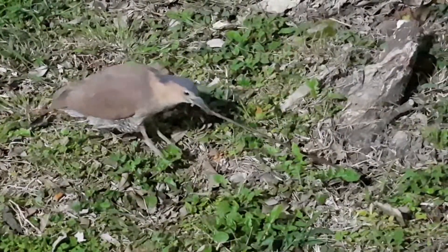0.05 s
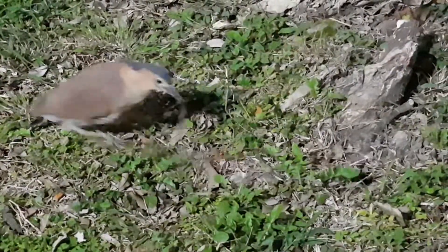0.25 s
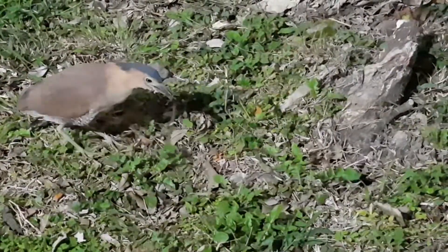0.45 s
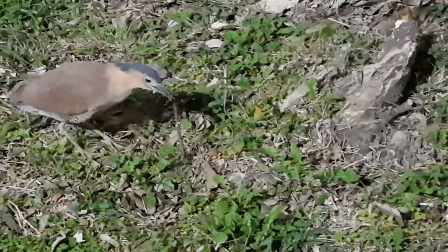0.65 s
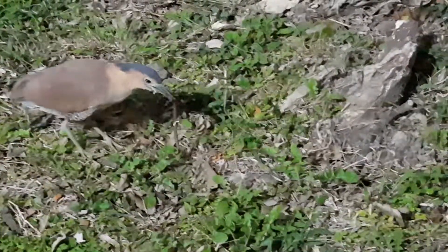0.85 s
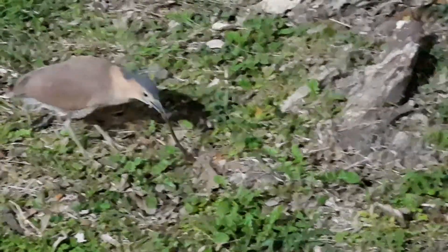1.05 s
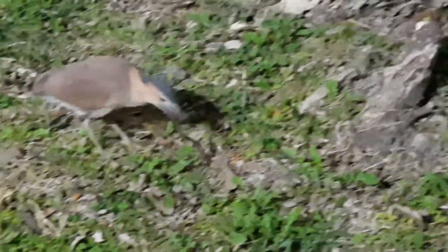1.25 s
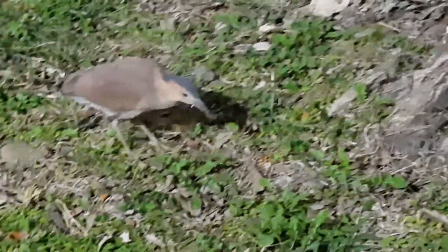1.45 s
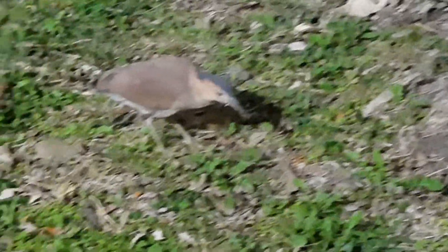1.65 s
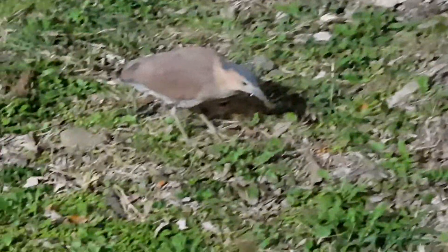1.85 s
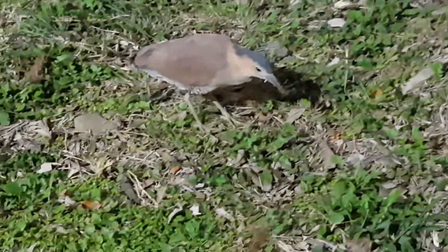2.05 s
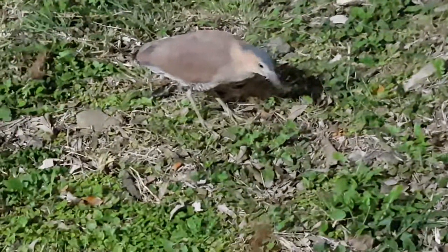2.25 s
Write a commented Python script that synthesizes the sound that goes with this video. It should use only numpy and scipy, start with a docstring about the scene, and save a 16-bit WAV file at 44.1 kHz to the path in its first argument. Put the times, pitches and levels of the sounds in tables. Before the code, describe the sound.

Low wind rumbles gently over open ground while the camera is shifted in the hand. Light finger rubs and small clicks lead to a short stutter with two pops close on the left, then a few soft thumps.

```python
"""Handling a camera outdoors

Air rumbles softly around a hand-held camera whose two microphone ports hiss.
As it is shifted, fingers slide over the case, making friction noise and small ticks.
At the left port, pushes of air give dull bumps, a finger judders by stick-slip motion,
and two sharp pressure pulses are heard as pops."""
import sys
import numpy as np
from scipy import signal
from scipy.fft import rfft, irfft, next_fast_len
from scipy.io import wavfile
from scipy.ndimage import map_coordinates

SR = 44100
rng = np.random.default_rng(int(sys.argv[2]) if len(sys.argv) > 2 else 0)


def master(y):
    """Save y as 16-bit WAV."""
    cut = np.clip(np.atleast_2d(y).T, -1, 1)
    pcm = np.round(cut * 32767)  # scale
    wavfile.write(sys.argv[1], SR, pcm.astype(np.int16))


N = 105840

# Envelopes of the outdoor rumble and its deepest part: t/s, level/dB
RUMBLE_ENVELOPE = [(0, -41), (.25, -41.5), (.42, -44), (.7, -41.5), (1.2, -40), (1.35, -45), (1.7, -46),
                   (1.95, -48), (2.2, -46), (2.4, -46)]
DEEP_ENVELOPE = [(0, -45), (.2, -41), (.55, -42.5), (.8, -43), (1.2, -42.5), (1.5, -47), (1.8, -46),
                 (2.2, -38.5), (2.4, -48)]
# Their spectra: f/Hz, relative density/dB
RUMBLE_SPECTRUM = [(15, -30), (40, -18.5), (75, 0), (120, 0), (170, -7), (300, -13.5), (500, -20.5),
                   (1000, -30), (2000, -50), (4000, -58)]
DEEP_SPECTRUM = [(15, -48), (27, -32), (37, -3), (58, 8), (80, -9.5), (130, -34.5), (500, -74)]
# Likeness of the rumble at the two ports: f/Hz, coherence/1
RUMBLE_COHERENCE = [(60, 0.92), (150, 0.99), (380, 0.83), (950, 0.17), (2400, 0.091)]
# Hiss of each port: f/Hz, relative density/dB
LEFT_HISS_SPECTRUM = [(200, -4), (700, -1), (1050, -14.5), (1550, -3.5), (2250, -10), (2650, -1),
                      (2950, -2), (3350, -18), (5000, -20), (6300, -35), (8000, -43), (10000, -26.5),
                      (12300, -26.5), (15500, -26)]
RIGHT_HISS_SPECTRUM = [(200, 4), (700, -3.5), (1500, -7.5), (2800, -15), (3600, -16.5), (5300, -12),
                       (5800, -3), (6300, 4), (7000, -4.5), (7600, -21), (9000, -31), (11000, -21),
                       (12300, -13), (13500, -21.5), (15500, -27)]
# Friction of a light brush (right), a slide at each port and a midrange swell (left): t/s, level/dB
BRUSH_ENVELOPE = [(.13, -66), (.17, -51), (.215, -50), (.275, -49.5), (.3, -57), (.36, -55), (.42, -67)]
LEFT_SLIDE_ENVELOPE = [(.7, -69), (.85, -66), (.95, -57.5), (1.05, -56), (1.16, -49), (1.22, -55),
                       (1.28, -69), (1.45, -75)]
RIGHT_SLIDE_ENVELOPE = [(.75, -71), (.95, -62), (1.08, -57.5), (1.2, -49.5), (1.35, -54.5), (1.57, -51.5),
                        (1.75, -55), (1.86, -61), (2, -88)]
SWELL_ENVELOPE = [(1, -73), (1.2, -49), (1.4, -60), (1.72, -56.5), (1.85, -70), (1.95, -84)]
# Their spectra: f/Hz, relative density/dB
BRUSH_SPECTRUM = [(400, -1), (1500, 1.5), (3000, -5.5), (4700, -1.5), (6300, 5.5), (8500, -10), (10500, -2),
                  (13000, -0.5), (15500, -7)]
LEFT_SLIDE_SPECTRUM = [(300, -10), (1000, -7), (2300, -20), (3700, -4.5), (5000, 1.5), (7500, -18),
                       (9300, -5), (11500, -11.5), (15500, -27)]
RIGHT_SLIDE_SPECTRUM = [(300, 2.5), (1000, -10.5), (1800, 0), (3300, -7), (4700, -3.5), (8500, -14),
                        (11500, -11), (15500, -19)]
SWELL_SPECTRUM = [(400, -3), (1200, -1.5), (2000, -0.5), (3300, -14), (6000, -38), (12000, -34)]
# Dry ticks on the case: t/s, level/dB, T60/s, left minus right/dB, ring f/Hz
CASE_TICKS = [(0.208, -40.5, 0.025, -26, 11000), (0.2106, -30, 0.015, -27, 10800),
              (0.2755, -30.5, 0.0064, -27, 11100), (.457, -43, .005, -14, 10900),
              (0.9202, -35, 0.015, 2, 4750), (1.025, -35, .012, 3.5, 5260),
              (1.7095, -23, 0.0057, -36, 6200), (1.7705, -42, 0.0042, -15, 6300),
              (2.097, -55, .005, -18, 6300), (2.3201, -31.5, 0.0072, -34, 5600)]
# Soft bumps at the left port: t/s, level/dB, f/Hz
PORT_BUMPS = [(.869, -23, 153), (.946, -22.5, 108), (1.652, -24, 92), (1.673, -25, 122), (1.695, -23, 131),
              (1.715, -14, 127), (1.722, -18, 73), (1.798, -27, 98)]
# Strength of the finger's slips over the left port: t/s, level/dB
JUDDER_ENVELOPE = [(1.203, -26), (1.221, -18), (1.236, -15), (1.26, -11), (1.292, -15), (1.312, -20),
                   (1.335, -27)]
# Spectra of a tick, the case's knock and the scuff under the slips: f/Hz, relative density/dB
TICK_SPECTRUM = [(500, -4), (2500, -11), (4500, -1.5), (6300, 4), (8000, -7.5), (11000, -3), (15500, -8)]
KNOCK_SPECTRUM = [(150, -12), (500, 4), (1100, -2.5), (1900, -9), (4000, -25), (9000, -50)]
SCUFF_SPECTRUM = [(25, -24), (70, -3), (250, -5.5), (450, -12.5), (800, -22), (2000, -41), (5000, -55)]
# Pressure pops in the left port: t/s, level/dB, f/Hz
PORT_POPS = [(1.2495, -6.5, 1640), (1.3489, -13, 1340)]

TIME = np.arange(N) / SR


def amp(db):
    """Amplitude ratio: tenfold for every 20 dB."""
    return 10 ** (np.asarray(db) / 20)


def unit_rms(x):
    """Normalisation to unit mean power."""
    return x / np.sqrt(np.mean(x ** 2) + 1e-20)


def curve_at(points, hz):
    """Interpolation on a logarithmic frequency axis."""
    f, values = np.transpose(points)
    return np.interp(np.log(hz + 1), np.log(f + 1), values)


def envelope(points):
    """Amplitude envelope, linear in decibels between the points and silent outside them."""
    times, db = np.transpose(points)
    return amp(np.interp(TIME, times, db)) * (TIME >= times[0]) * (TIME <= times[-1])


def wobble(knots_per_s):
    """Smooth random modulation: a spline through Gaussian values."""
    knots = rng.standard_normal(int(N * knots_per_s / SR) + 4)
    return map_coordinates(knots, [TIME * knots_per_s])


def filtered(x, response):
    """Linear filtering: the spectrum is multiplied by a frequency response."""
    size = next_fast_len(N + SR // 2)
    return irfft(rfft(x, size) * response(np.fft.rfftfreq(size, 1 / SR)), size)[..., :N]


def noise(spectrum):
    """Spectral shaping of white noise, at unit rms."""
    return unit_rms(filtered(rng.standard_normal(N), lambda hz: amp(curve_at(spectrum, hz))))


def distant_noise(spectrum, left_bias_db=1.04):
    """Partial coherence: noise from afar is nearly the same at both ports in the bass."""
    angle = lambda hz: np.arccos(np.clip(curve_at(RUMBLE_COHERENCE, hz), -1, 1)) / 2
    mid = filtered(noise(spectrum), lambda hz: np.cos(angle(hz)))
    side = filtered(noise(spectrum), lambda hz: np.sin(angle(hz)))
    return np.array([(mid + side) * amp(left_bias_db), (mid - side) * amp(-left_bias_db)])


def air_rumble(flutter_db=1.1):
    """Amplitude-modulated noise of outdoor air: a fluttering body over a deep, slower part."""
    body = distant_noise(RUMBLE_SPECTRUM) * envelope(RUMBLE_ENVELOPE) * amp(flutter_db * wobble(14))
    deep = distant_noise(DEEP_SPECTRUM) * envelope(DEEP_ENVELOPE)
    return body + deep


def port_hiss(left_db=-55.5, right_db=-53):
    """Resonance: each port colours its own steady hiss."""
    return np.array([amp(left_db) * noise(LEFT_HISS_SPECTRUM),
                     amp(right_db) * noise(RIGHT_HISS_SPECTRUM)])


def friction(levels, spectrum, grain_db=1.4):
    """Friction noise, given a fine grain by rapid random modulation."""
    return envelope(levels) * unit_rms(noise(spectrum) * amp(grain_db * wobble(250)))


def finger_slides():
    """Sliding friction of skin on the case, each stroke heard at the nearer port."""
    left = friction(LEFT_SLIDE_ENVELOPE, LEFT_SLIDE_SPECTRUM)
    left += friction(SWELL_ENVELOPE, SWELL_SPECTRUM)
    right = friction(RIGHT_SLIDE_ENVELOPE, RIGHT_SLIDE_SPECTRUM)
    right += friction(BRUSH_ENVELOPE, BRUSH_SPECTRUM)
    return np.array([left, right])


def case_ticks(attack_s=0.00026, ring_db=9.5, half_width_hz=1000):
    """Damped resonance: skin catches on the case, giving a noise burst with a short ring."""
    out = np.zeros((2, N))
    for start, db, t60, pan_db, ring_hz in CASE_TICKS:
        age = np.maximum(TIME - start, 0)
        shape = (1 - np.exp(-age / attack_s)) * np.exp(-np.log(1000) * age / t60)
        pan = amp([[pan_db / 2], [-pan_db / 2]])
        resonance_db = lambda hz: ring_db / (1 + ((hz - ring_hz) / half_width_hz) ** 2)
        response = lambda hz: amp(curve_at(TICK_SPECTRUM, hz) + resonance_db(hz))
        ring = unit_rms(filtered(rng.standard_normal((2, N)), response))
        out += amp(db) * shape * pan / np.linalg.norm(pan) * ring
    return out


def pulse(centre_s, hz, skew=0):
    """Bipolar pressure pulse, down then up: a Gaussian derivative whose start steepens with skew."""
    phase = np.clip(2 * np.pi * hz * (TIME - centre_s), -20, 20)
    phase *= 1 - skew * np.tanh(phase)
    return phase * np.exp((1 - phase ** 2) / 2)


def port_bumps(knock_db=-23, knock_s=0.0027):
    """Low-frequency pressure pulses: air is pushed into the port, led by a faint knock of the case."""
    case_noise = amp(knock_db) * noise(KNOCK_SPECTRUM)
    out = np.zeros(N)
    for centre, db, hz in PORT_BUMPS:
        knock = case_noise * np.exp(-((TIME - centre) / knock_s + 1) ** 2)
        out += amp(db) * (pulse(centre, hz, skew=0.48) + knock)
    return out


def finger_judder(slips_per_s=68, slip_hz=110, time_scatter=0.119, pitch_scatter=0.12, scuff_db=-19):
    """Stick-slip motion: an uneven train of dull pulses over a low scuff."""
    times, db = np.transpose(JUDDER_ENVELOPE)
    scuff = amp(scuff_db) * envelope(JUDDER_ENVELOPE) * noise(SCUFF_SPECTRUM)
    slips = np.zeros(N)
    for beat in np.arange(times[0], times[-1], 1 / slips_per_s):
        centre = beat + time_scatter * rng.standard_normal() / slips_per_s
        hz = slip_hz * np.exp(pitch_scatter * rng.standard_normal())
        slips += amp(np.interp(beat, times, db)) * pulse(centre, hz, skew=0.48)
    return scuff + slips


def port_pops(octave_gain=0.39, crack_db=-26, leak_gain=0.75, leak_s=0.00097):
    """Pressure transients, likely as a finger seals the port: suction, a snap, then a short leak."""
    out = np.zeros(N)
    for centre, db, hz in PORT_POPS:
        age = np.maximum(TIME - centre, 0)
        suction = np.exp(-np.abs(2 * np.pi * hz * (TIME - centre) + 1) / 2)
        snap = pulse(centre, hz) + octave_gain * pulse(centre, 2 * hz)
        crack = amp(crack_db) * pulse(centre, 5.3 * hz)
        leak = leak_gain * (1 - np.exp(-age * hz)) ** 2 * np.exp(-age / leak_s)
        out += amp(db) * (snap + crack - suction + leak)
    return out


def scene():
    """Superposition at two ports; bumps, judder and pops reach only the left."""
    out = air_rumble() + port_hiss() + finger_slides() + case_ticks()
    out[0] += port_bumps() + finger_judder() + port_pops()
    return out


def record(dry):
    """Band limiting: the camera cuts the deepest bass and passes nothing above its upper limit."""
    low_cut_hz, top_hz = 29, 15850
    high_pass = signal.butter(2, low_cut_hz, "high", fs=SR, output="sos")
    return filtered(signal.sosfilt(high_pass, dry), lambda hz: hz < top_hz)


dry = scene()
out = record(dry)
master(out)
```